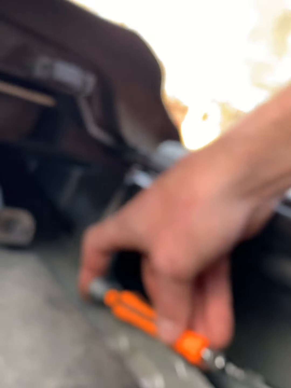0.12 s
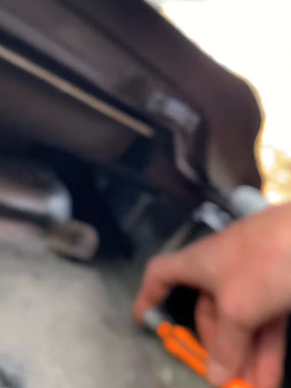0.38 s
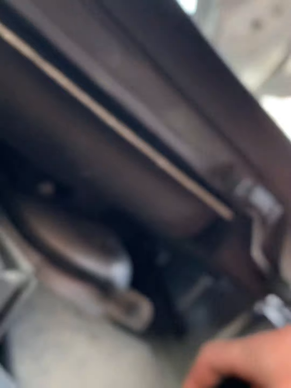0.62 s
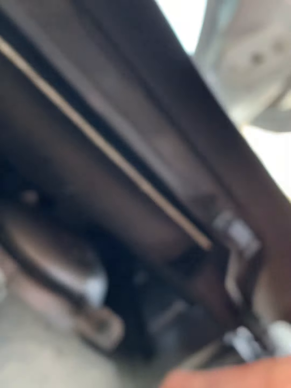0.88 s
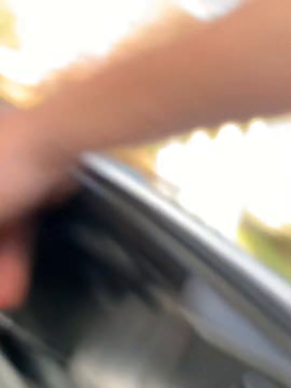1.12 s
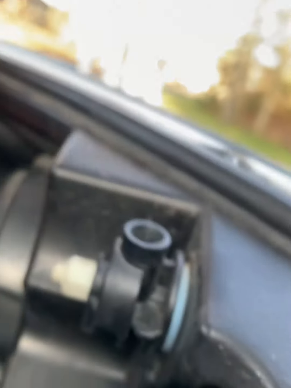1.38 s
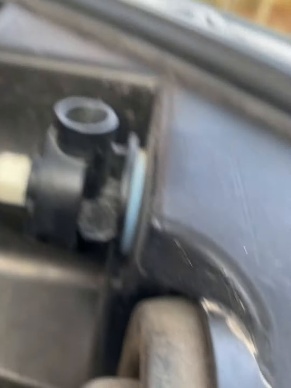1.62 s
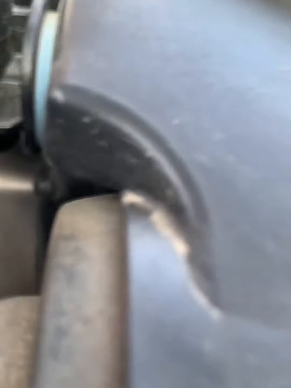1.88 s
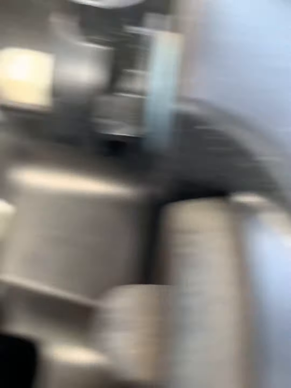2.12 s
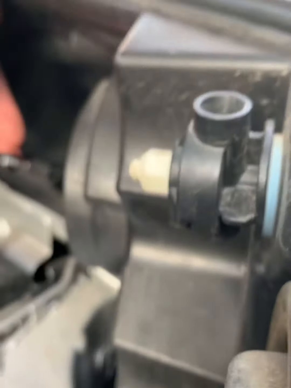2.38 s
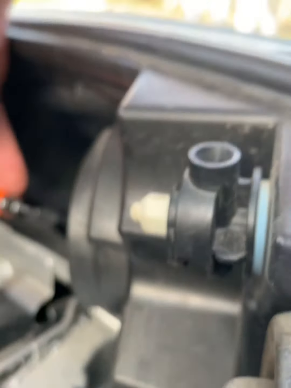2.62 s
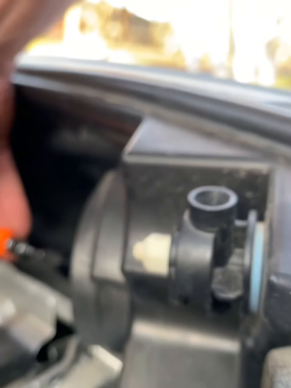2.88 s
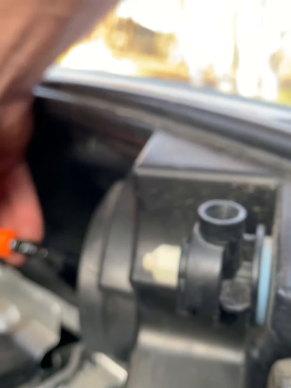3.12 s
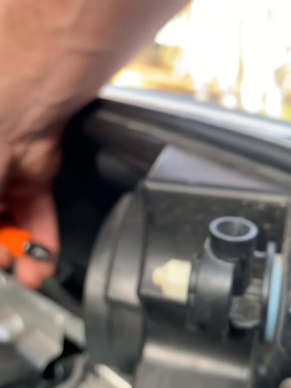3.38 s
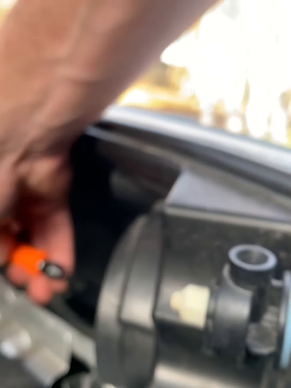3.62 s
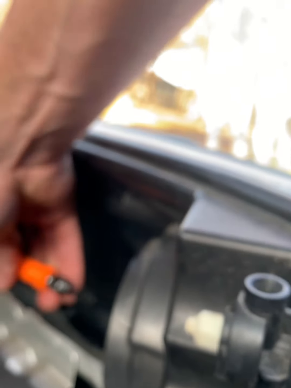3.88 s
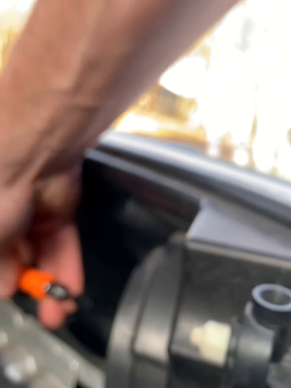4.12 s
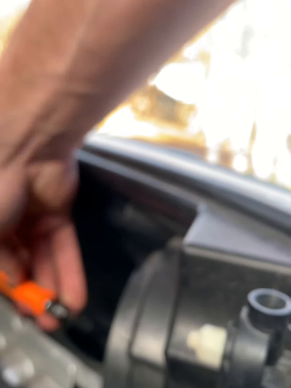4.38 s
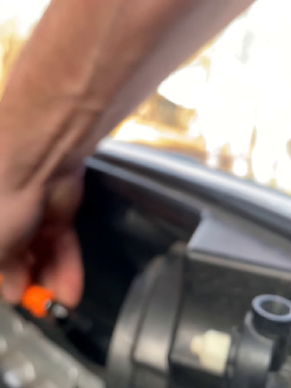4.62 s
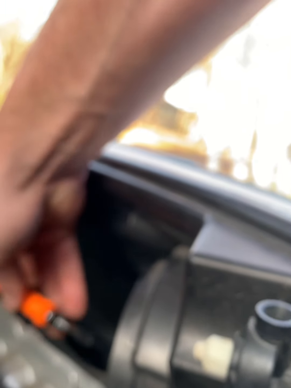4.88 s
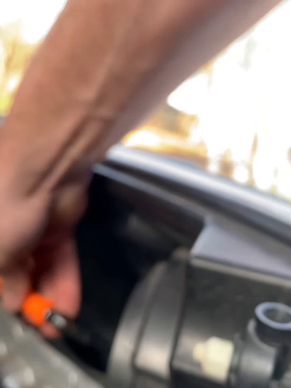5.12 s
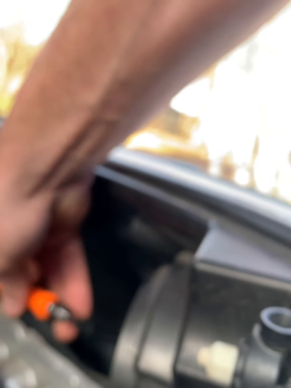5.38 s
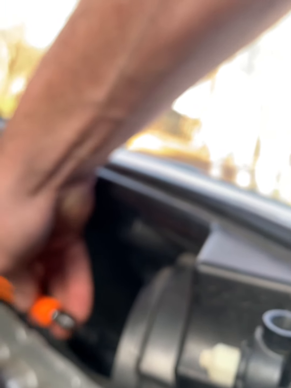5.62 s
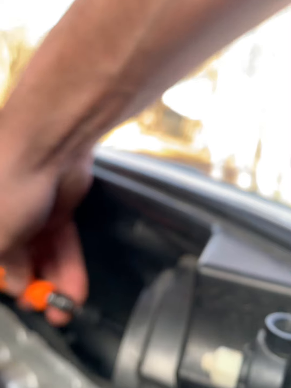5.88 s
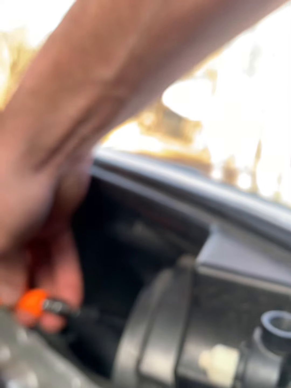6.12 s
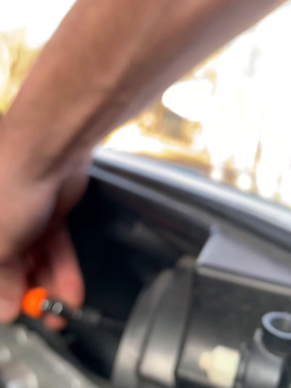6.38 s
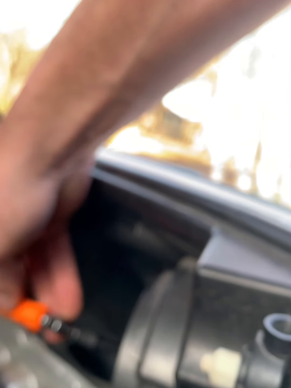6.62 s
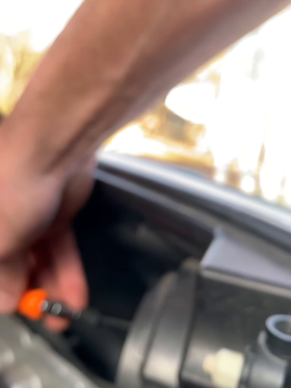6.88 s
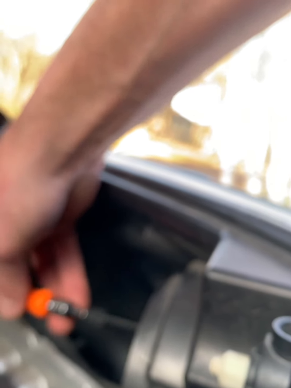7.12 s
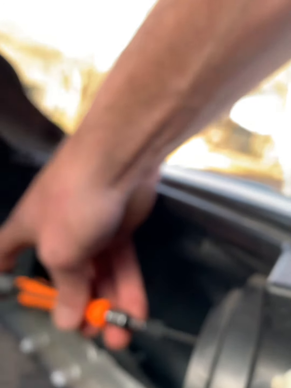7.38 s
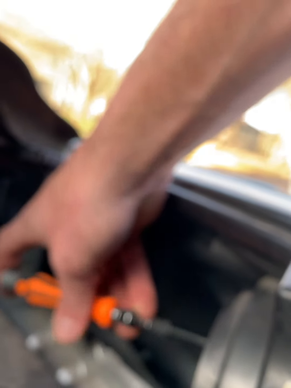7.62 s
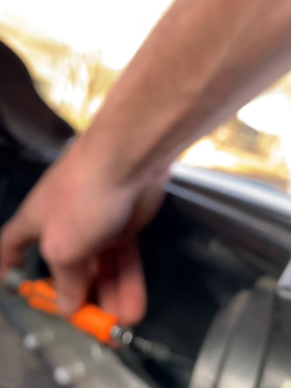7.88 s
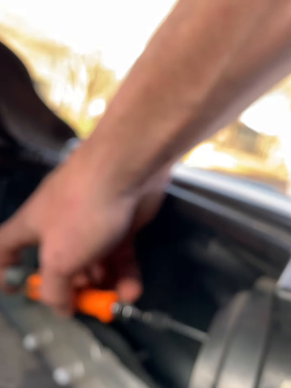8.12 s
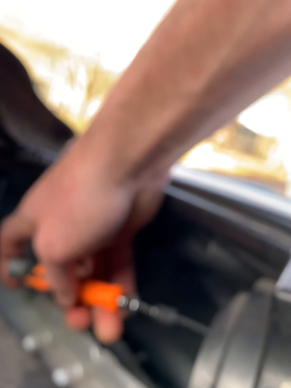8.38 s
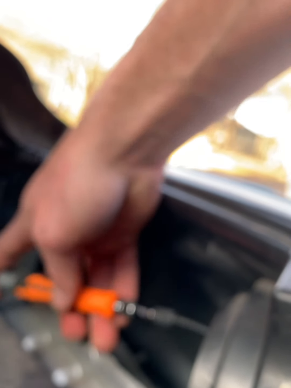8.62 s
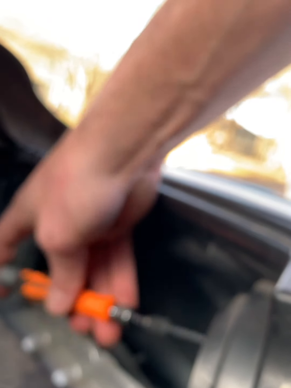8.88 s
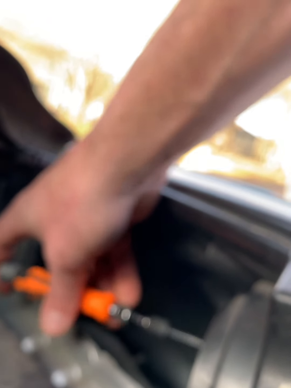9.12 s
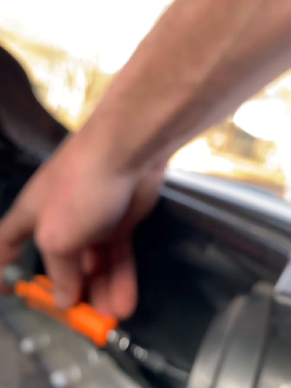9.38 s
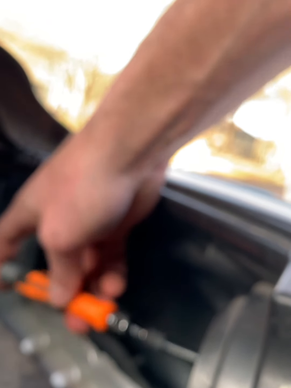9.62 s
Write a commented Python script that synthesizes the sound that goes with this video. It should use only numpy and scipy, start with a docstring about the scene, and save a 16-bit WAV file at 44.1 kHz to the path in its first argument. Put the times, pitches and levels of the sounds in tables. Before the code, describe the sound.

Light clicks and ticks of a hand-turned steel tool on a plastic housing, with handling bumps and faint rubbing over a steady low hum outdoors.

```python
"""Flexible screwdriver at a plastic housing

Outdoors, a camera's two microphone ports close to the hand: steel taps and handle knocks excite damped modes,
while fingers and sleeve rub as dense random slips. Bumps on the camera are falling sweeps, its shell creaks
in short clicks of noise. Far off a machine hums as a wavering tone with overtones, over filtered-noise rumble and air.
"""
import sys
import numpy as np
from scipy import signal
from scipy.fft import rfft, irfft
from scipy.io import wavfile
from scipy.ndimage import uniform_filter1d

SR = 44100
rng = np.random.default_rng(int(sys.argv[2]) if len(sys.argv) > 2 else 0)


def undo_db(level):
    """Turn decibels back into plain size, where 20 dB means ten times bigger."""
    steps = np.asarray(level, float) / 20
    return 10 ** steps


def generate_wav(sig):
    """Save sig (samples, or channels by samples) to the path in sys.argv[1] as 16-bit PCM at SR."""
    pcm = np.round(np.clip(np.atleast_2d(sig).T, -1, 1) * 32767).astype(np.int16)
    wavfile.write(sys.argv[1], SR, pcm)


N = 429975  # samples

# Low rumble and soft air. Each row: frequency in Hz, relative density in dB per Hz.
AIR = [(30, -54), (45, -10.5), (70, 0), (100, 4), (160, -11), (350, -19.5), (700, -30), (1400, -39),
       (3000, -48), (6000, -48.5), (15500, -56), (16200, -72)]
# Left-right likeness of the air. Each row: frequency in Hz, likeness from 0 to 1.
LIKENESS = [(150, 0.98), (500, 0.78), (800, 0.062), (3000, 0.48), (4500, 0.96)]
# Distant machine. Each row: time in seconds, level of the fundamental in dB, gain of the overtones in dB.
HUM = [(0, -53.5, -93.5), (2, -45, -68.5), (2.399, -54, -70), (3.303, -49, -71.5), (3.9, -55.5, -67.5),
       (5.198, -52.5, -69), (5.701, -51.5, -65.5), (7.502, -49, -64), (8.198, -63.5, -68.5),
       (8.602, -51, -69.5), (9.75, -44.5, -78.5)]
# Overtones of the machine. Each row: multiple of the fundamental, relative level in dB.
OVERTONES = [(2, 2.5), (3, -1), (3.5, -3), (4, -6.5), (5, -12.5)]
# Hand sliding over tool and camera. Each row: start in seconds, length in seconds, level in dB.
GRIP = [(.16, 0.066, -64.5), (.22, 0.33, -67.5), (.37, 0.23, -57), (.57, 0.098, -69), (.665, 0.078, -56.5),
        (.73, 0.14, -62), (1.075, 0.025, -54), (1.84, 0.1, -59.5), (1.96, 0.037, -64.5), (2.06, 0.088, -62),
        (2.43, 0.066, -69), (7.16, 0.074, -58.5), (7.27, 0.072, -61.5), (7.36, 0.11, -71.5)]
# Bumps on the camera body. Each row: start in seconds, level in dB.
BUMPS = [(1.041, -16), (1.08, -29), (1.338, -40), (2.057, -25.5), (2.121, -43), (2.44, -48.5),
         (7.181, -41.5), (7.198, -33), (7.331, -32.5)]
# Sharp creaks of the camera's shell. Each row: time in seconds, level in dB.
SNAPS = [(1.048, -6), (1.0551, -16), (1.087, -22.5), (1.099, -34.5), (2.0636, -24), (2.259, -42),
         (7.2984, -42), (8.001, -36)]
# Steel tip and shaft touching the housing. Each row: time in seconds, level in dB, loudest region in Hz.
TAPS = [(1.3387, -42, 1490), (1.425, -48.5, 1160), (2.2568, -48, 2960), (2.494, -48, 1200),
        (2.731, -47.5, 1180), (3.589, -42, 3220), (3.605, -46.5, 1400), (3.692, -45, 1434),
        (4.06, -15.5, 2080), (4.0663, -22, 2270), (4.081, -21.5, 2020), (4.227, -33.5, 2700),
        (4.237, -22.5, 1260), (4.352, -42, 2950), (4.722, -41.5, 1200), (4.7685, -42, 1890),
        (4.8195, -38, 1150), (5.3347, -16.5, 988), (6.299, -33, 1314), (6.4688, -34, 910),
        (7.074, -40, 1140), (7.109, -29.5, 1410), (7.134, -40, 1200), (7.1564, -40, 1310),
        (7.202, -35.5, 1090), (7.6106, -30.5, 1980), (7.7265, -41.5, 1390), (7.82, -52.5, 910),
        (8.201, -23, 910), (8.2428, -37, 980), (8.327, -28, 1210), (8.399, -53, 2900), (8.417, -55, 2920),
        (8.4829, -29.5, 950), (8.685, -39, 910), (8.752, -34.5, 940), (8.8205, -40, 910),
        (9.1285, -22.5, 1020), (9.262, -21.5, 1390), (9.368, -42.5, 1160), (9.6293, -41, 2300)]
# Modes of shaft and housing. Each row: frequency in Hz, relative level in dB.
RING = [(180, -5), (312, -0.5), (430, 5.5), (646, 1.5), (1175, 3.5), (1375, 0.5), (1600, -3.5), (1810, -14),
        (2080, 6), (2800, 6), (3920, 2.5), (5760, 3.5), (6250, 5)]
# Modes of the bit holder as it clicks over. Each row: frequency in Hz, relative level in dB.
HOLDER = [(760, -4.5), (905, 1.5), (1430, 5), (1890, -2), (2400, -1.5), (2980, 4.5), (3700, 0), (6250, -2)]
# Dull knocks of the plastic handle. Each row: time in seconds, level in dB, loudest region in Hz.
KNOCKS = [(1.6188, -43, 1630), (2.6277, -47, 1460), (2.673, -48, 767), (2.757, -49.5, 1117),
          (2.8604, -40, 1500), (3.543, -46.5, 355), (4.372, -43, 1820), (4.933, -44, 1280),
          (5.673, -38, 1870), (5.686, -47, 1950), (5.9563, -33.5, 1045), (9.164, -44, 445),
          (9.682, -46, 693)]
# Fingers scraping on tool and housing. Each row: start in seconds, length in seconds, level in dB.
STROKES = [(2.72, 0.089, -64), (3.24, 0.1, -53.5), (3.43, 0.078, -61.5), (3.54, 0.27, -61.5),
           (3.89, 0.18, -61), (4.1, .13, -65), (6.54, 0.064, -65), (4.36, 0.35, -67.5),
           (7.12, 0.069, -54.5), (7.72, 0.048, -56), (4.71, 0.13, -55.5), (5.59, 0.17, -54.5)]
# Sleeve swishing over the housing. Each row: start in seconds, length in seconds, level in dB.
SWISHES = [(2.9, 0.51, -70), (3.09, 0.16, -58.5), (3.87, 0.11, -64.5), (6.11, 0.061, -64.5),
           (7.6, 0.054, -55), (7.86, 0.29, -81.5), (8.81, 0.19, -73), (9.12, 0.078, -57),
           (9.54, 0.13, -69.5)]
# The two ports, for sound through the air. Each row: frequency in Hz, lead of the left port in radians.
PORTS_AIR = [(0, 0.052), (600, 0.72), (1400, 1.5), (2100, 2), (3800, 1.33), (4700, np.pi),
             (17600, 7 * np.pi)]
# The two ports, for sound through the camera body. Each row: frequency in Hz, lead of the left port in radians.
PORTS_BODY = [(0, 0), (150, .25), (350, 1.5), (700, np.pi), (4700, np.pi), (17600, 7 * np.pi)]

THUD_TOP_HZ = 700
LOW_MODES = [mode for mode in RING if mode[0] < THUD_TOP_HZ]
HIGH_MODES = [mode for mode in RING if mode[0] > THUD_TOP_HZ]
LEAD_IN_S = .015  # lead-in before the strike, in seconds
SPREAD_DB, RING_T60_S = 3.5, .021  # random spread of mode levels; decay of a mode at 1500 Hz


def evened(x):
    """Scales to rms 1."""
    return x / np.sqrt(np.mean(x ** 2) + 1e-20)


def read(points, hz):
    """Reads a spectrum on a log-frequency axis."""
    f, value = np.transpose(points)
    return np.interp(np.log(hz + 1), np.log(f + 1), value)


def add(mix, s, sound):
    """Mixes a sound in at time s."""
    part = mix[round(s * SR):][:len(sound)]
    part += sound[:len(part)]


def slow(t, lo_hz, hi_hz):
    """Slow random drift of rms 1: sines of random phase, the slower ones stronger."""
    sines = [np.sin(2 * np.pi * (f * t + rng.random())) / np.sqrt(f) for f in np.geomspace(lo_hz, hi_hz, 20)]
    return evened(sum(sines))


def air():
    """Rumble and air: random short-time spectra with drifting patches and a slow swell."""
    frames, hz = N // 512 + 5, np.fft.rfftfreq(2048, 1 / SR)
    a, b, c, d, patches = rng.standard_normal((frames, 1025, 5)).T
    patches = evened(uniform_filter1d(uniform_filter1d(patches, 30, 0), 10, 1))
    swell = slow(np.arange(frames) * 512 / SR, 0.12, 6.2)
    same = np.clip(read(LIKENESS, hz), -1, 1)[:, None]
    left = a + 1j * b
    right = same * left + np.sqrt(1 - same ** 2) * (c + 1j * d)
    z = np.array([left, right]) * undo_db(read(AIR, hz)[:, None] + 2.4 * patches + 1.2 * swell)
    return undo_db(-50) * evened(signal.istft(z, nperseg=2048, noverlap=1536)[1][:, :N])


def hum():
    """Distant machine: a tone with a few overtones, wavering slightly in pitch and level."""
    t = np.arange(N) / SR
    s, base_db, over_db = np.transpose(HUM)
    pitch = 96.6 * (1 + 0.0025 * slow(t, 0.1997, 3))  # Hz
    turns = 2 * np.pi * np.cumsum(pitch) / SR
    over = sum(undo_db(db + 1.3 * slow(t, 0.5286, 2.7)) * np.sin(k * turns) for k, db in OVERTONES)
    base = undo_db(np.interp(t, s, base_db) + 1.4 * slow(t, 1.9, 26)) * np.sin(turns)
    return np.sqrt(2) * (base + undo_db(np.interp(t, s, over_db)) * over)


def rubs(strokes, tilt_db, low_hz, grain_db):
    """Friction: dense tiny slips, some larger, swelling and fading within each stroke; tilt in dB per octave."""
    frames, hz = N // 128 + 5, np.fft.rfftfreq(512, 1 / SR)
    t, power = np.arange(frames) * 128 / SR, np.zeros((257, frames))
    colour = evened(undo_db(tilt_db * np.log2((hz + 900) / 2000)) * (hz / (hz + low_hz)) ** 2)
    for start, length, db in strokes:
        on = (t >= start) & (t <= start + length)
        power[:, on] += np.outer(undo_db(db) * colour, signal.windows.tukey(on.sum(), .7)) ** 2
    sizes = undo_db(grain_db * np.minimum(rng.exponential(1, N), 5))
    slips = evened(rng.standard_normal((2, N)) * sizes)
    # the ports differ in the lows only
    slips[1] = slips[0] + 1.2 * signal.lfilter(*signal.butter(3, 2200, fs=SR), slips[1])
    z = signal.stft(slips, nperseg=512, noverlap=384)[2]
    patches = uniform_filter1d(rng.standard_normal((frames, 257)), 20, 0)
    patches = evened(uniform_filter1d(patches, 2, 1)).T
    jerks = evened(uniform_filter1d(rng.standard_normal(frames), 3))  # the contact catches and lets go
    rough = np.sqrt(power) * undo_db(4.5 * patches + 2.5 * jerks)
    return signal.istft(z * rough[:, :z.shape[2]], nperseg=512, noverlap=384)[1][:, :N]


def grip():
    """The hand slides over tool and camera: soft, dark friction."""
    return rubs(GRIP, tilt_db=-8, low_hz=1500, grain_db=1.9)


def nearby(x, t60, wet_db):
    """Hard surfaces close by: short sparse random tails, different in each channel."""
    at = np.arange(40, 8000, 20) + rng.integers(0, 20, (3, 2, 398))
    tails = np.zeros((3, 2, 8040))
    np.put_along_axis(tails, at, rng.choice([-1., 1.], at.shape) * undo_db(-60 * at / SR / t60), 2)
    tails = signal.lfilter([1], [1, -.93], tails)  # duller than the direct sound
    tails = signal.lfilter(*signal.butter(2, 130, "high", fs=SR), tails)  # and without deep bass
    # three random tails taking turns, seven changes a second
    turn = np.arange(N) * 7 // SR % 3 == np.arange(3)[:, None, None]
    wet = signal.oaconvolve(x * turn, tails / np.linalg.norm(tails[0, 0]), axes=2).sum(0)[:, :N]
    return x + undo_db(wet_db) * wet


def bumps():
    """A push on the body swings the microphones: a falling sweep, a short ring of the casing, low shaking."""
    out, t = np.zeros(N), np.arange(8192) / SR
    pitch = 38 + 60 * np.exp(-t / .03) + 420 * np.exp(-t / 0.0055) + 3000 * np.exp(-t / 0.00053)  # Hz
    swing = np.sin(2 * np.pi * np.cumsum(pitch) / SR)
    casing = sum(a * np.sin(2 * np.pi * hz * t) for hz, a in [(470, 1), (600, .5), (1230, .12)])
    casing = 1.1 * np.exp(-t / 0.014) * casing
    for s, db in BUMPS:
        noise = rng.standard_normal(8192)
        shake = evened(signal.lfilter(*signal.butter(1, [30, 150], "band", fs=SR), noise))
        envelope = undo_db(db - 60 * t / 0.18) * (1 - np.exp(-t / 0.0045))  # falls 60 dB in 0.18 s
        add(out, s, envelope * (swing + 0.22 * shake + casing))
    return out


def snaps():
    """Creaks of the camera's shell: very short bright clicks of band-passed noise."""
    out = np.zeros(N)
    for s, db in SNAPS:
        click = rng.standard_normal(400) * signal.windows.gaussian(400, 9)
        click = signal.lfilter(*signal.butter(2, [6800, 14500], "band", fs=SR), click)
        add(out, s - 180 / SR, undo_db(db) * click / abs(click).max())
    return out


def peaked(x, centre_hz, below_db, above_db):
    """Causal (minimum-phase) colour with a slope on each side of a centre, in dB per octave."""
    size = 2 * len(x)
    octaves = np.log2((abs(np.fft.fftfreq(size, 1 / SR)) + 100) / centre_hz)
    gain = np.log(undo_db(np.where(octaves > 0, above_db, below_db) * octaves))
    return irfft(rfft(x, size) * np.exp(signal.hilbert(gain).conj())[:size // 2 + 1])[:len(x)]


def struck(table, rattle_s, detune=0.059):
    """Noise swells softly in, then strikes and rattles: a crack, and the modes in a new mix; high modes die first."""
    t = np.arange(4096) / SR
    hz, db = np.transpose(table)[:, :, None]
    noise, mix = rng.standard_normal((2, 4096)), rng.standard_normal((2, len(table), 1))
    fade_db = 60 * t / RING_T60_S * (hz / 1500) ** 0.67
    modes = undo_db(db + SPREAD_DB * mix[0] - fade_db) * np.sin(2 * np.pi * hz * (1 + detune * mix[1]) * t)
    late = np.maximum(t - LEAD_IN_S, 0)
    lead_in = undo_db(-17) * np.exp((t - LEAD_IN_S) / 0.0047) * (t < LEAD_IN_S)
    strike = (1 - np.exp(-late / .0004)) * np.exp(-late / rattle_s)
    rattle = noise[0] * abs(noise[1]) * (lead_in + strike)
    ring = signal.fftconvolve(rattle, modes.sum(0))[:4096]
    crack = rattle * (late > 0) * np.exp(-late / 0.0049)
    return evened(crack), evened(ring)


def taps():
    """Steel on plastic cracks and rings briefly over a thud of the low modes."""
    out = np.zeros(N)
    for s, db, hz in TAPS:
        height = np.log2(hz / 910)  # octaves
        # the springy shaft rattles on; the tip only ticks
        rattle_s = .006 if 1100 < hz < 2400 else .003
        crack, ring = struck(HOLDER if hz < 1100 else HIGH_MODES, rattle_s)
        # the crack grows faster than the ring: harder taps are brighter
        hit = ring + undo_db(0.27 * (db + 26)) * crack
        # higher taps fall away faster above and stir the low modes less
        hit = peaked(hit, hz, below_db=13.1, above_db=-4 * height)
        thud = struck(LOW_MODES, 0.012, detune=0.11)[1]
        thud_db = -13.5 - 7 * height
        tap = hit / abs(hit).max() + undo_db(thud_db) * thud / abs(thud).max()
        add(out, s - LEAD_IN_S - .001, undo_db(db) * tap)
    return out


def knocks():
    """The plastic handle knocks: high and low modes ring together, dulled above the loudest region."""
    out = np.zeros(N)
    for s, db, hz in KNOCKS:
        ring = struck(HIGH_MODES + HOLDER, 0.013)[1]
        ring = ring + undo_db(-1.5) * struck(LOW_MODES, 0.031, detune=0.098)[1]
        knock = peaked(ring, hz, below_db=5, above_db=-8.5)
        add(out, s - LEAD_IN_S - .001, undo_db(db) * knock / abs(knock).max())
    return out


def ringing(x):
    """Scraping stirs the shaft: lifts the sound at its high modes, each 37 Hz wide."""
    hz = np.fft.rfftfreq(N, 1 / SR)
    lift = sum(undo_db(db) / (1 + (2 * (hz - f) / 37) ** 2) for f, db in HIGH_MODES)
    return irfft(rfft(x) * (1 + undo_db(-3) * lift) / 2, N)


def scrapes():
    """Fingers scrape on tool and housing: coarse friction that makes the shaft ring."""
    return ringing(rubs(STROKES, tilt_db=-8.5, low_hz=307, grain_db=3.5))


def swishes():
    """The sleeve swishes over the housing: brighter friction."""
    return rubs(SWISHES, tilt_db=-3, low_hz=308, grain_db=3.75)


def ports(pair, lead):
    """Turns the phase of the right channel back by the lead of the left port."""
    hz, radians = np.transpose(lead)
    turn = np.exp(-1j * np.interp(np.fft.rfftfreq(N, 1 / SR), hz, radians))
    return np.array([pair[0], irfft(rfft(pair[1]) * turn, N)])


def scene():
    """Air-borne and body-borne sound reach the two ports differently."""
    friction = grip() + scrapes() + swishes()
    strikes = nearby(taps() + knocks(), t60=0.11, wet_db=-8.5)
    through_air = air() + hum() + friction + strikes
    through_body = nearby(bumps(), t60=0.069, wet_db=-7.5) + nearby(snaps(), t60=0.031, wet_db=-3.5)
    both = ports(through_air, PORTS_AIR) + ports(through_body, PORTS_BODY)
    return undo_db([[-.4], [.4]]) * both  # the right port is a little louder


def top_cut(x):
    """Nothing passes above the cut-off."""
    return signal.sosfilt(signal.butter(12, 17310, fs=SR, output="sos"), x)


def record(dry):
    """The camera's band limit: a linear-phase low-pass at 16.4 kHz."""
    limited = signal.oaconvolve(dry, signal.firwin(255, 16400, fs=SR)[None], "same")
    return top_cut(limited)


dry = scene()
out = record(dry)
generate_wav(out)
```